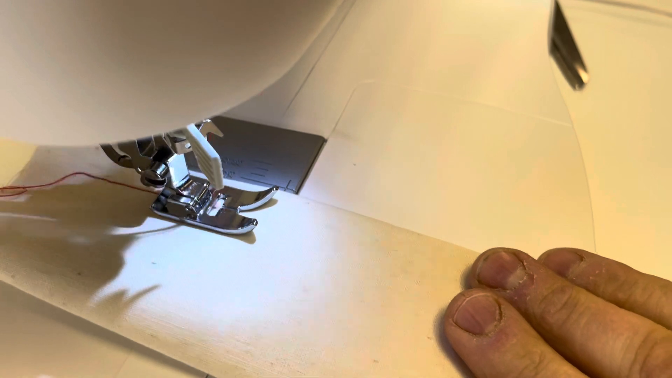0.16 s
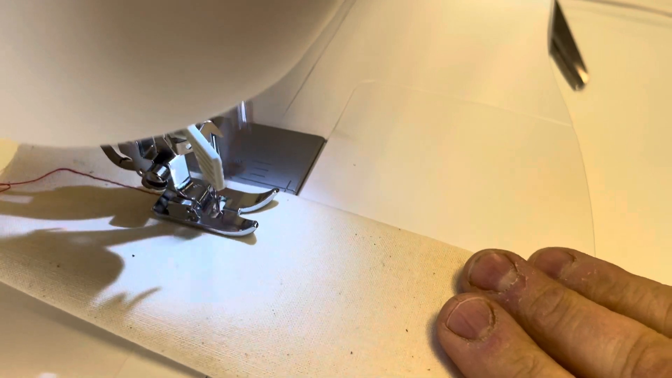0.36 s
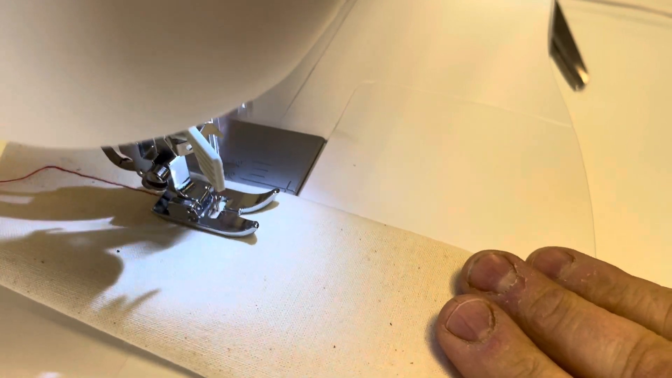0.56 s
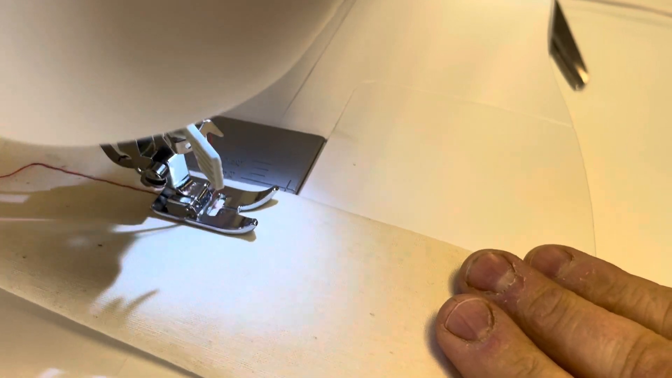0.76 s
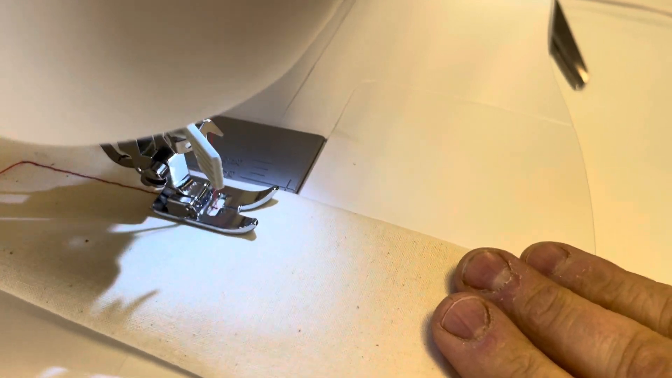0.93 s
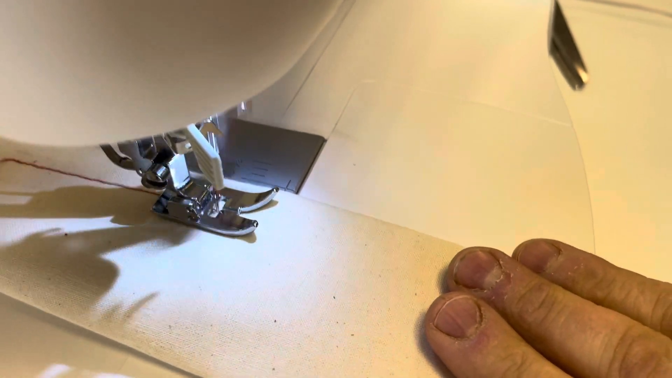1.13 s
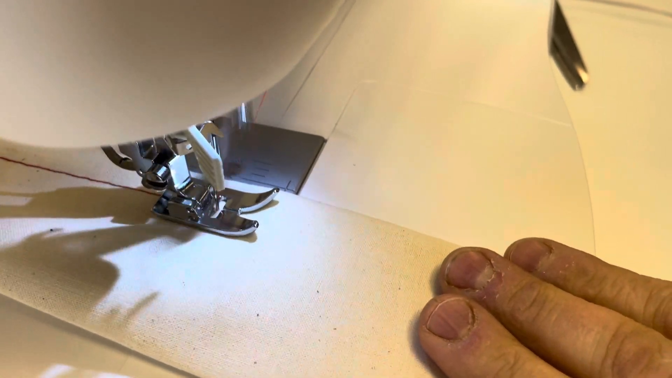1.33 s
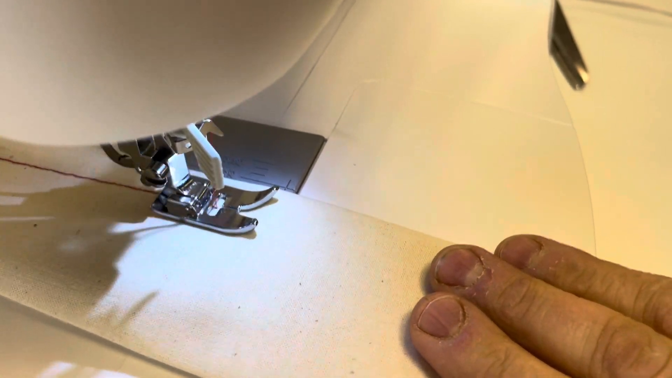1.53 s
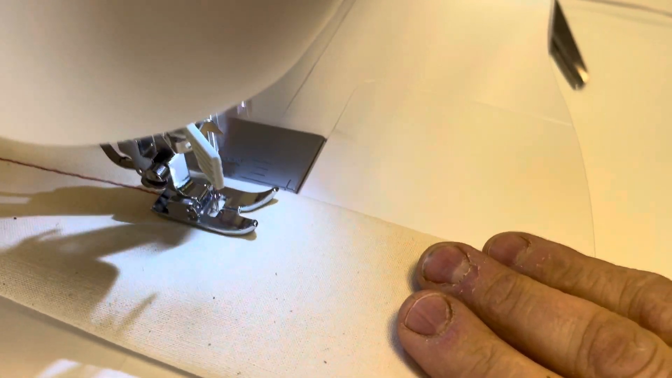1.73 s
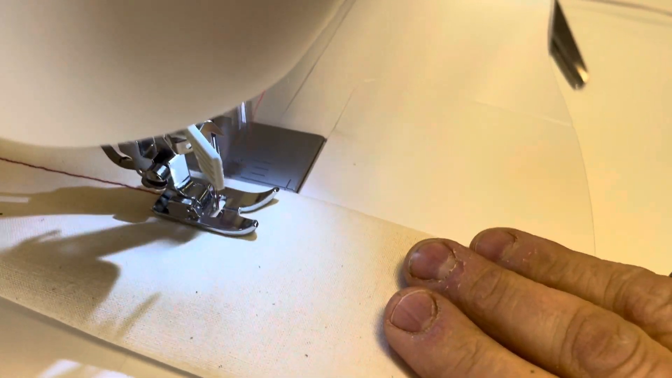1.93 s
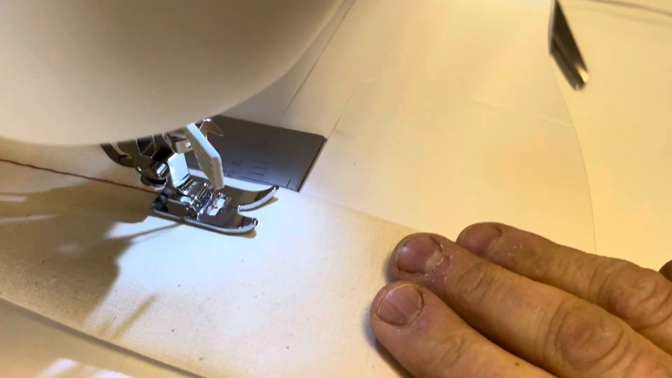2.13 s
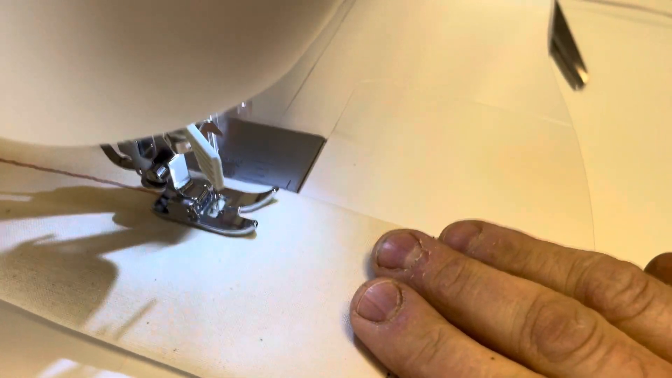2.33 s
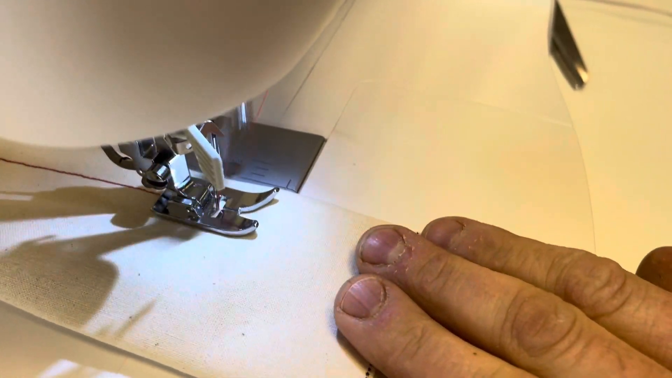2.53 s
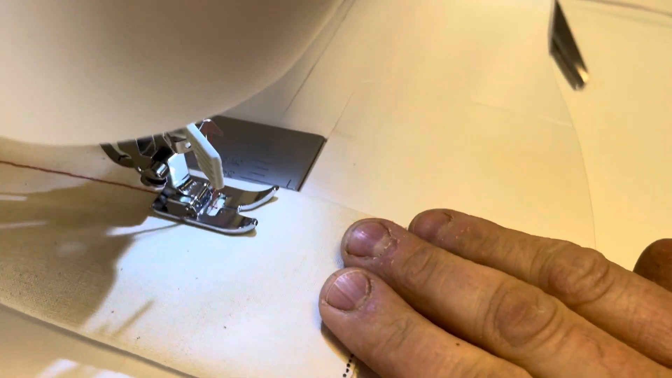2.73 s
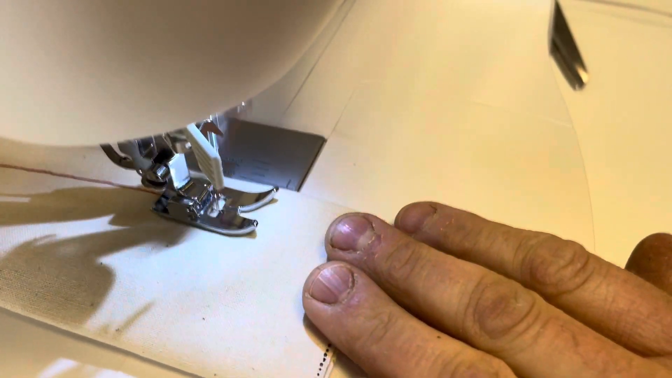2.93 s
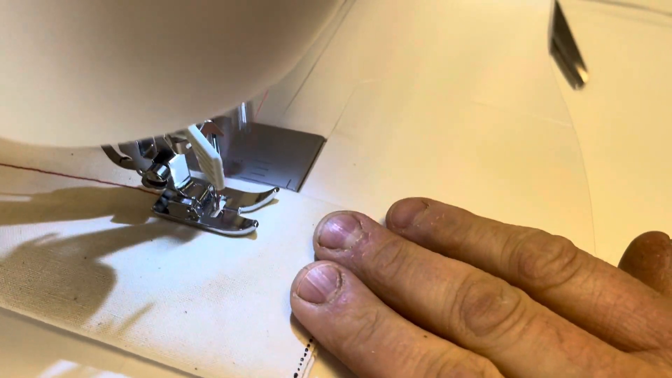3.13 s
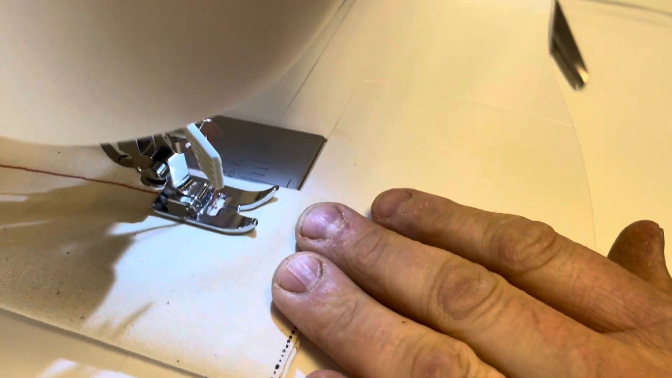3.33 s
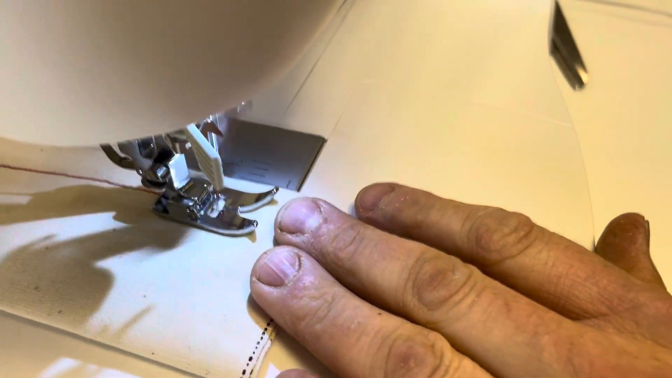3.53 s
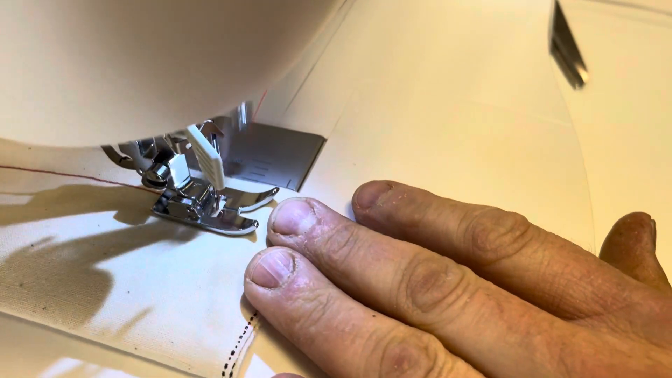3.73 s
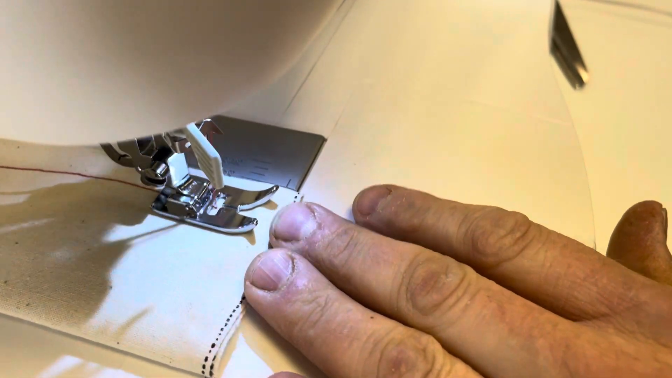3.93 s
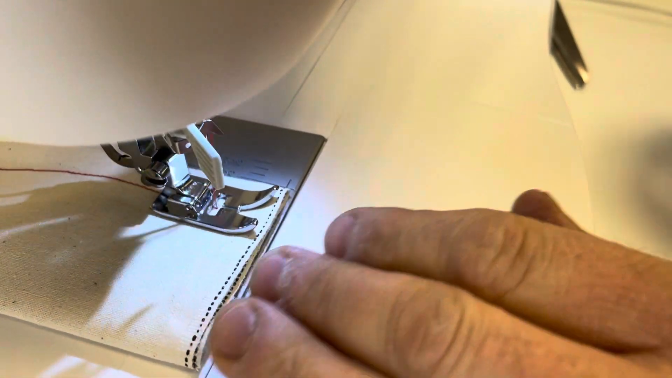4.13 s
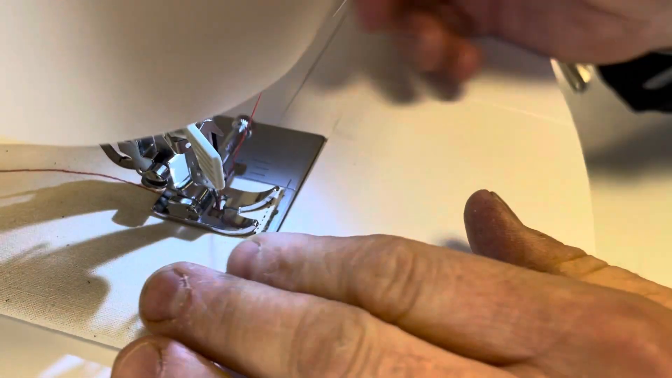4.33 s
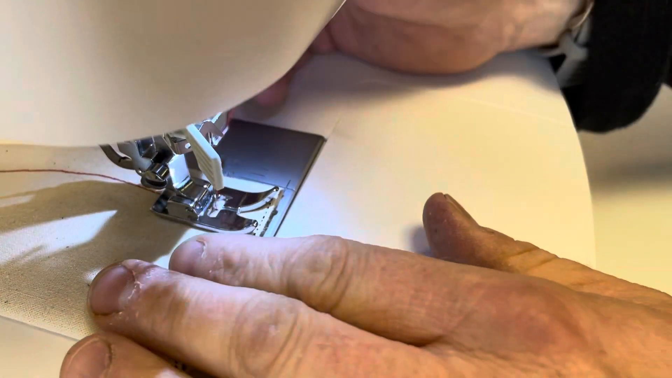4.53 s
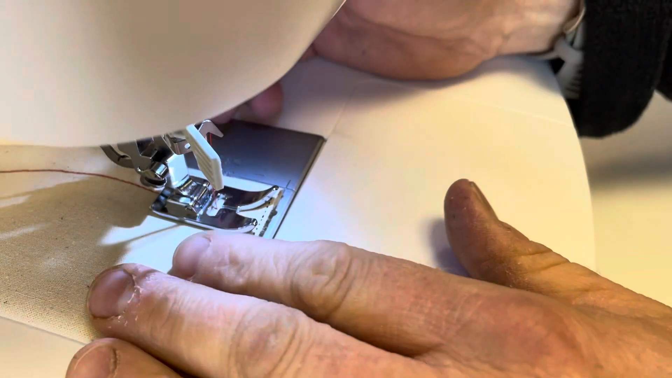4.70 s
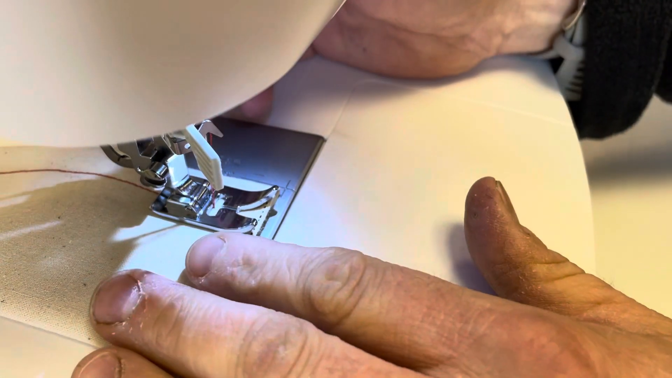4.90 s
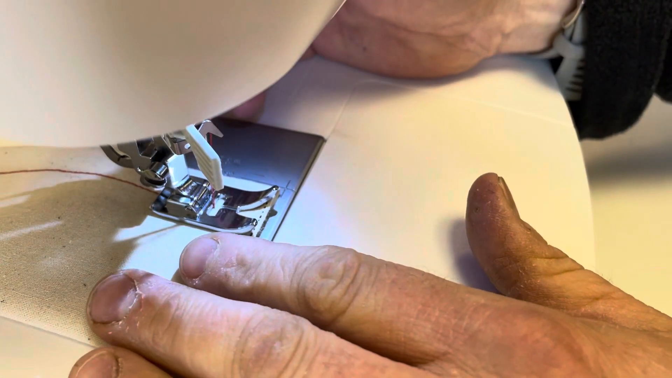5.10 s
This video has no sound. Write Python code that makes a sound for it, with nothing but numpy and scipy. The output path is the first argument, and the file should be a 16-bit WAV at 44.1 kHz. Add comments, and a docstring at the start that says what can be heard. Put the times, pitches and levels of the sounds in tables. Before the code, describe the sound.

A sewing machine is heard very close, in stereo, in a quiet, dry indoor room. From 0 to about 4.0 s it stitches at steady full speed, almost twelve turns a second: a dense, hollow, rattling drone with low motor hum, gear noise, a mid-pitched housing song, sharp bright hook ticks, uneven needle-bar clatter, cam knocks and low jolts through the table. Around 4.0-4.2 s the drive drops quickly, with a wavering whine near 500 Hz. From 4.2 to 4.75 s it creeps, much quieter, with a low rough buzz, thin whine and scattered soft knocks; grainy cloth swishing is clearest from 4.25 to 4.5 s. At about 4.75 s it clicks and dies away. Near silence follows, with a faint knock and short beating ring at 4.93 s. At about 5.08 s the motor kicks in again with knocks, and a low buzzing crawl continues to the end near 5.26 s.

```python
"""At a table in a quiet room, a sewing machine stitches steadily, slows to a crawl, halts and restarts.
Motor kicks are clicks and noise ringing the housing, with gear noise swelling along with the kicks;
hum, buzz and a wavering song are tones. Each turn of the shaft brings a hook tick, needle-bar clatter
and cam knocks from noise bursts, plus decaying tones for blows and table jolts; cloth swishes as
grainy noise while the machine slows. All is heard close up, in stereo."""
import sys
import numpy as np
from scipy import signal
from scipy.fft import rfft, irfft, next_fast_len
from scipy.io import wavfile
from scipy.ndimage import uniform_filter1d

SR = 44100
rng = np.random.default_rng(int(sys.argv[2]) if len(sys.argv) > 2 else 0)


def generate_wav(sig):
    """Save sig (samples, or channels by samples) to the path in sys.argv[1] as 16-bit PCM at SR."""
    pcm = np.round(np.clip(np.atleast_2d(sig).T, -1, 1) * 32767).astype(np.int16)
    wavfile.write(sys.argv[1], SR, pcm)


N = 231877  # length [samples]
HZ = np.fft.rfftfreq(4096, 1 / SR)  # frequency grid on which filters are drawn [Hz]

# quiet room: (frequency [Hz], relative level [dB])
FLOOR = [(24, -28), (40, 7.5), (75, -1), (110, -19), (173, -18), (490, -24), (710, -67), (956, -48),
         (1390, -69), (15000, -67)]
FLOOR_DB = -50.014
# the table rocks on its legs when leaned on: (time [s], level before the trim [dB])
ROCKING = [(2.81, -33), (3.41, -34), (3.95, -27), (4.15, -46), (4.44, -41), (4.83, -45.5)]
ROCKING_DB, ROCKING_TRIM = -44, 0.78  # steady level before the trim; trim as a gain
ROCK_S, STILL_S = 0.091, 4.88  # width of a lean and of the settling; time the table comes to rest
# low modes of the table top: (frequency [Hz], level [dB], t60 [s])
TABLE = [(69.65, -8, 0.72), (94.4, -7.5, 0.39), (102.9, -14, 0.41), (126.5, -9, 0.68)]
# jolts into the table on every turn: (shaft angle [turns], level [dB])
JOLTS = [(0.185, -48), (0.359, -25.5), (0.72, -31), (0.975, -37)]

# broad slope of the housing: (frequency [Hz], relative level [dB])
HOUSING = [(30, -15), (90, -2.5), (170, -7), (260, -3.5), (500, -0.5), (750, -6.5), (1100, -10),
           (2000, -19), (3500, -23.5), (5000, -25.5), (6600, -30.5), (7600, -34), (10500, -37.5),
           (12500, -38.5), (13700, -37), (14200, -32), (15000, -29), (15700, -32), (15900, -50),
           (16600, -70) ]
# housing modes: (frequency [Hz], width [Hz], height over the slope [dB])
HOUSING_MODES = [(49.6, 11, -9), (107.7, 51, 18), (201, 41, 4.5), (245.6, 19.7, 6.5), (274, 67, 2),
                 (341.6, 13.4, 9.5), (455.6, 51, 5.5), (530, 61, 4), (646, 143, 6.5), (858, 32, 5),
                 (981.6, 54, 9.5), (1213, 95, 5), (1728, 130, 9), (2173, 72, 6), (1832, 42, 3.5),
                 (2490, 39, 6.5), (2730, 66, 2), (2964, 140, 5.5), (4240, 120, 2), (3495, 520, 5.5),
                 (5960, 380, 1.5), (7700, 600, 6), (8940, 140, 5.5), (10700, 720, 4)]
# stereo picture: (frequency [Hz], left-right likeness [0-1])
SAME = [(40, .9), (70, .98), (170, .86), (300, .9), (400, .76), (510, .94), (750, .45), (1400, .46),
        (1800, .64), (4500, .7), (6000, .5), (6800, .95), (7300, .98), (8000, .95), (8600, .84), (9400, .7),
        (9900, .94), (10700, .98), (11700, .96), (12500, .55), (13300, .65), (14100, .98), (15000, .98),
        (15800, .9)]
# stereo picture: (frequency [Hz], left level over right [dB])
LOUDER_LEFT = [(60, 0), (110, 3.5), (200, -5.5), (380, 0.5), (700, 6), (1290, 3.5), (2380, 4), (4400, 4.5),
               (6000, 4.5), (6800, 0), (15000, 2)]
# stereo picture: (frequency [Hz], phase step of the right side [half turns])
PHASE_STEP = [(0, -.05), (320, -.03), (400, -.24), (900, -.27), (1500, -.15), (1800, 0), (3100, -.2),
              (5200, .03), (5700, .1), (6500, 1), (8500, 1), (9600, 2), (12300, 2), (13400, 3), (17000, 3)]
BASS_CUT_HZ, EDGE_HZ = 38, 16900  # lower and upper limit of the whole sound

# effort of the drive:
# (time [s], housing level [dB], gear rattle over it [dB], fizz over it [dB])
DRIVE = [(0, -24, -5.5, -22.5), (4.0, -23.5, -6, -19), (4.03, -28, -4.5, -11), (4.082, -26.5, -9, -26),
         (4.132, -27, -11.5, -19.5), (4.24, -37.5, -14, -21), (4.274, -34, -18, -10.5),
         (4.338, -37.5, -6, -6.5), (4.42, -33, -10, -18), (4.55, -33.5, -16.5, -23),
         (4.63, -33.5, -17, -40), (4.75, -34, -22, -25), (4.765, -37.5, -22, -28), (4.8, -52, -57, -22),
         (4.94, -77, 11, -28), (5.07, -57, -26, -26), (5.086, -39.5, -9.5, -34), (5.126, -31.5, -15.5, -16),
         (5.168, -37, -12, -40), (5.186, -33.5, -15, -18.5), (5.258, -33, -17, -32)]
DRIVE_EASES_S = DRIVE[1][0]
# motor kicks: (time [s], kick rate [1/s], share of the drive that comes as kicks [0-1])
KICKS = [(0, 317, 0.14), (4.0, 330, 0.24), (4.2, 152, 0.22), (4.4, 114, 0.36), (4.75, 99, 0.7),
         (5.26, 108, 0.43)]
KICK_DECAY_S = 0.0093
RUMBLE_DB, CRAWL_RUMBLE_DB = -28, -12  # table rumble over the housing, at full speed and after it
UNEVEN_DB, FIZZ_FLICKER_DB = 1, 3.5  # random swell of the load; flicker at the top of the rattle
HUM_HZ, HUM_DB, CRAWL_HUM_DB = 98.2, -9.5, -12.5  # levels over the housing level
# buzz of the motor as the shaft creeps: (multiple of BUZZ_HZ, level over the housing level [dB])
BUZZ = [(1, -10.5), (2, -11), (8, -43), (10, -26.5), (12, -40), (14, -31)]
BUZZ_HZ = 225.7
# the song as the machine crawls and restarts, one table a stretch:
# (time [s], frequency [Hz], level [dB])
WHINE = [
    [(4.24, 540, -35), (4.3, 544, -38), (4.35, 541.5, -42), (4.39, 543, -44), (4.43, 543, -35.5),
     (4.62, 545, -37.5), (4.66, 547, -47), (4.7, 539, -39), (4.76, 537, -46)],
    [(5.078, 540.5, -42), (5.11, 544, -39), (5.16, 521, -43), (5.2, 537, -35.5), (5.258, 540, -37)],
]
# the song wavers between about 495 and 532 Hz and swells as the machine slows:
# (time [s], frequency [Hz], level [dB])
SLOWING = [(4.0, 529.9, -24), (4.012, 532, -29), (4.026, 520.4, -20.5), (4.048, 496, -19),
           (4.062, 495, -37), (4.068, 497, -28), (4.094, 520, -33), (4.136, 505, -22), (4.178, 521, -30.5),
           (4.198, 500, -36), (4.225, 508, -55)]
# a part rings on, beating, after the halting knock: (time [s], frequency [Hz], level [dB])
AFTER_RING = [(4.915, 599, -48), (4.943, 630, -40), (4.953, 650, -38), (4.961, 645, -52), (4.971, 650, -41),
              (4.983, 645, -42.5), (4.992, 646, -59), (5.035, 636, -67), (5.05, 641, -75)]
# two fading housing modes that sing at full speed:
# (frequency [Hz], first level [dB], last level [dB])
SONG = [(551, -29.5, -39), (513.7, -35.5, -43.5)]
SONG_SWELL_DB = 2
# parts that ring with a clear pitch near the halt:
# (time [s], frequency [Hz], level [dB], t60 [s])
RINGS = [(4.758, 994, -39, 0.057), (4.935, 1690, -60, 0.18), (5.122, 964, -36, 0.06),
         (4.925, 800, -36, 0.07), (5.1, 105, -28.5, 0.4), (5.125, 235, -28, .1), (4.385, 93, -31, 0.64)]
# the cloth slides under the hands: (time [s], swish level [dB], high hiss level [dB])
CLOTH = [(4.2, -73, -85), (4.235, -50, -57), (4.28, -44, -51), (4.33, -43, -52), (4.37, -42, -48),
         (4.41, -42, -45), (4.47, -49.5, -55), (4.6, -58, -72), (4.75, -54, -76), (4.8, -81, -84)]
# colour of the swish: (frequency [Hz], relative level [dB])
SWISH = [(500, -31), (1000, 4), (1500, 12.5), (2200, 10), (4000, 1.5), (8000, -12), (11000, -21),
         (16000, -16)]

TURNS_PER_S, START_ANGLE = 11.652, .232  # full speed; shaft angle at time zero [turns]
FULL_SPEED_ENDS = 4.06  # [s]
# The levels from here on are nominal: the rise and fall of each blow lower its peak.
LINKS_PER_S, LINKS_DB, LINKS_TREBLE_DB = 1000, -34, -47.5  # lowest levels, the first one at 1 kHz
# single placed blows: (time [s], nominal level [dB], pitch [Hz])
THUDS = [(.083, -3, 555), (.24, -6, 580), (0.514, -5.5, 560), (.602, -6, 563), (.684, -4, 530),
         (1.111, -5, 545), (1.13, -5, 675), (1.201, -5.5, 516), (1.285, -3.5, 565), (1.479, -3.5, 594),
         (1.544, -4, 509), (2.054, -6, 493), (2.303, -4, 544), (2.357, -5, 570), (2.573, -3.5, 544),
         (3.0, -1.5, 555), (3.096, -2.5, 513), (3.43, -4.5, 560), (3.518, -3, 551), (3.563, -2, 524),
         (3.602, -3, 470), (3.794, -3.5, 515), (3.862, -3, 470), (3.898, -3.5, 563), (3.948, -4.5, 495),
         (4.438, -20.5, 533), (4.459, -24, 497), (4.499, -27, 545), (4.508, -25, 545), (4.517, -17, 550),
         (4.554, -19, 552.4), (4.601, -23, 556), (4.692, -17.5, 520), (4.715, -20, 507), (4.735, -24, 506),
         (4.93, -20, 264), (5.083, -21, 524), (5.094, -15.5, 530), (5.128, -11.5, 283), (5.182, -22, 540),
         (5.205, -15, 570)]
# blows inside the housing on every turn:
# (shaft angle [turns], pitch [Hz], mean nominal level [dB], decay [s])
BLOWS = [(0.018, 293, -21, 0.0063), (0.141, 333, -17.5, 0.0047), (.30, 240, -20.5, 0.0064),
         (.31, 348, -19.5, 0.0036), (0.449, 294, -22.5, 0.0057), (0.559, 296, -17, 0.0036),
         (0.749, 248.4, -16.5, 0.0056), (0.929, 311, -15.5, 0.0027), (.0, 539, -15.5, 0.0065),
         (.12, 560, -14, 0.0027), (0.204, 516, -11.5, 0.004), (.355, 546, -12, 0.0037),
         (0.459, 555, -16, 0.0047), (.63, 540, -15.5, .004), (.78, 524, -8, 0.0024),
         (0.859, 550, -14, 0.0035), (.26, 1005, -21.5, 0.0023), (.325, 982, -22, 0.0047),
         (.63, 875, -18, 0.0032), (.935, 1020, -15, 0.0012), (0.996, 1020, -22.5, 0.0032)]
BLOW_SPREAD_DB, BLOW_JITTER_S = 2, .00015
THUD_S, BLOW_RISE_S = 0.0038, 0.0026
# cam knocks on every turn:
# (shaft angle [turns], centre [Hz], width [Hz], mean nominal level [dB], decay [s])
CAMS = [(0.17, 5000, 3600, -29, 0.0036), (.21, 10300, 2700, -39.5, 0.0023),
        (.87, 9760, 3700, -36.5, 0.0049), (0.23, 1900, 570, -26.5, 0.0027), (0.322, 990, 630, -19, 0.0017),
        (.63, 810, 660, -26.5, 0.0025), (0.915, 1360, 590, -25, 0.0053), (0.909, 1010, 480, -22.5, 0.0055)]
# single knocks as the shaft creeps:
# (time [s], nominal level [dB], centre [Hz], width [Hz], decay [s])
KNOCKS = [(4.066, -22.5, 8700, 4000, 0.0033), (4.157, -27, 6030, 5000, 0.0056),
          (4.187, -30, 7100, 3994, 0.00253), (4.745, -34, 9200, 9000, 0.013),
          (4.759, -29, 990, 600, 0.0072), (4.793, -38.5, 4570, 4020, 0.0083),
          (4.922, -38.5, 2900, 1970, 0.0053), (4.928, -36, 1750, 2590, 0.019),
          (4.983, -45.5, 5770, 2000, 0.0053), (5.075, -40, 2660, 3030, 0.015),
          (5.11, -44, 6000, 1490, 0.007), (5.124, -28.5, 4360, 5030, 0.0094), (5.122, -25, 980, 600, 0.008),
          (5.18, -37, 5000, 6000, 0.0057)]
# turns on which the needle bar slams:
# (time [s], nominal level [dB], treble over it [dB])
CLATTERS = [(0.15, -14, -3), (0.239, -10.5, -2.5), (0.323, -11, -4.5), (0.409, -14, -0.5), (0.841, -12, -5),
            (1.009, -13, -4), (1.09, -12.5, -21), (1.181, -15, -11), (1.262, -19.5, -18), (1.439, -11, -8),
            (1.69, -12.5, -13), (1.783, -15, 1.5), (1.87, -12.5, -4), (1.953, -13, -6), (2.034, -14.5, -9),
            (2.126, -10, -6), (2.211, -12, -4.5), (2.296, -11.5, -1.5), (2.469, -16, -2), (2.551, -14, -11),
            (2.642, -17, -5), (2.721, -15, -9), (2.893, -13, -17), (2.977, -14.5, -29),
            (3.072, -10.5, -5.5), (3.153, -17, -21), (3.24, -12, -8), (3.498, -17, -8), (3.585, -11, -10),
            (3.758, -10.5, -6), (3.845, -10, -5.5), (3.923, -16.5, -14)]
CLATTER_TURN = .93  # shaft angle of the soft clatters [turns]
CLATTER_DB, CLATTER_SPREAD_DB, CLATTER_TREBLE_DB = -19.5, 4.5, -14
# the hook itself rings: (frequency [Hz], mean nominal level [dB])
TICK_RINGS = [(9110, -26.5), (5540, -32)]
TICK_RING_S = 0.0021  # decay
TICK_TURN, TICK_JITTER_S = .477, .0008  # the hook catches the thread: shaft angle [turns], jitter
TICK_DB, TICK_MIDDLE_DB, TICK_SPREAD_DB, MIDDLE_SPREAD_DB = -20.5, -26, 1.2, 2
REBOUND_S, REBOUND_DB = 0.0047, -9.5  # delay after the tick, level over it


def gain_of(db):
    """Amplitude ratio of a level in dB."""
    return 10 ** (np.asarray(db) / 20)


def read(points, hz):
    """Curve through (frequency, value) points, straight on a log frequency axis."""
    f, value = np.transpose(points)
    return np.interp(np.log(hz + 1), np.log(f + 1), value)


def wander(size):
    """Slow random drift of unit strength, smoothed twice over the given number of samples."""
    x = uniform_filter1d(uniform_filter1d(rng.standard_normal(N), size), size)
    return x / x.std()


def band(lo_hz, hi_hz):
    """dB shape of a pass band with soft skirts."""
    return -10 * np.log10((1 + (lo_hz / (HZ + 1)) ** 6) * (1 + (HZ / hi_hz) ** 6))


def colour(x, shape_db):
    """Causal minimum-phase filter of the given dB shape, scaled so that white noise keeps its power."""
    mirrored_db = np.r_[shape_db, shape_db[-2:0:-1]]
    log_gain = np.log(gain_of(np.maximum(mirrored_db, -150)))
    taps = np.fft.ifft(np.exp(np.conj(signal.hilbert(log_gain)))).real
    return signal.oaconvolve(x, taps[None] / np.linalg.norm(taps))[:, :N]


def housing_db():
    """Broad slope of the casing with its modes standing out."""
    modes_db = sum(db / (1 + (2 * (HZ - hz) / width) ** 2) for hz, width, db in HOUSING_MODES)
    return read(HOUSING, HZ) + modes_db


def bursts(s, size, decay, rise=.0005):
    """Envelope of blows: rise times exponential fall, scaled by size; a slow rise lowers the peak."""
    at = np.zeros(N)
    t = np.arange(round(8 * decay * SR)) / SR
    np.add.at(at, np.clip(np.round(np.asarray(s) * SR).astype(int), 0, N - 1), size)
    return abs(signal.oaconvolve(at, (1 - np.exp(-t / rise)) * np.exp(-t / decay))[:N])


def random_moments(per_s):
    """Times scattered at random at the given mean rate."""
    return np.flatnonzero(rng.random(N) < per_s / SR) / SR


def shaken(envelope):
    """Two unrelated noises under one envelope: what both sides share and what only the right one gets."""
    return envelope * rng.standard_normal((2, N))


def each_turn(angle, jitter):
    """Moments at which the shaft passes an angle while at full speed."""
    s = (np.arange(60) + angle - START_ANGLE) / TURNS_PER_S + jitter * rng.standard_normal(60)
    return s[(s > 0) & (s < FULL_SPEED_ENDS)]


def room():
    """Steady noise floor of the quiet room."""
    return gain_of(FLOOR_DB) * colour(shaken(1), read(FLOOR, HZ))


def rocking():
    """Dull noise at the very bottom, steady while the machine moves, swelling with each lean."""
    t = np.arange(N) / SR
    level = gain_of(ROCKING_DB) * np.clip((STILL_S - t) / ROCK_S, .1, 1)
    level += sum(gain_of(db) * np.exp(-((t - s) / ROCK_S) ** 2) for s, db in ROCKING)
    return level * colour(shaken(ROCKING_TRIM), band(40, 74.5))


def table():
    """Jolts ring the low modes of the table top, with a slightly different strength on each turn."""
    t, at = np.arange(SR // 2) / SR, np.zeros(N)
    ring = sum(gain_of(db - 60 * t / t60) * np.sin(2 * np.pi * hz * t) for hz, db, t60 in TABLE)
    for angle, db in JOLTS:
        s = each_turn(angle, .0006)
        at[(s * SR).astype(int)] += gain_of(db + 1.25 * rng.standard_normal(len(s)))
    ring = signal.oaconvolve(ring, signal.windows.hann(200) / 100)  # a jolt is a soft push
    return signal.oaconvolve(at, ring)[:N] * np.array([[1], [0]])


def cloth():
    """Fibres slipping: a coarse, grainy swish that wakes the housing modes, with a thin hiss on top."""
    s, swish_db, hiss_db = np.transpose(CLOTH)
    t = np.arange(N) / SR
    grain = 0.77 + bursts(random_moments(500), 0.9, 0.001, rise=0.00025)
    grain = grain * gain_of(1.2 * wander(400))
    modes_db = housing_db() - read(HOUSING, HZ)
    swish_noise = shaken(grain * gain_of(np.interp(t, s, swish_db)))
    hiss_noise = shaken(grain * gain_of(np.interp(t, s, hiss_db)))
    return colour(swish_noise, read(SWISH, HZ) + 0.27 * modes_db) + colour(hiss_noise, band(6200, 7700))


def plate():
    """Parts near the halt give dying tones with a soft start."""
    out = np.zeros(N)
    for s, hz, db, t60 in RINGS:
        t = np.maximum(np.arange(N) / SR - s, 0)
        out += gain_of(db - 60 * t / t60) * (1 - np.exp(-t / 0.0014)) * np.sin(2 * np.pi * hz * t)
    return out * np.array([[1], [.5]])


def whine(rows, swell_db=0, unsteady=1):
    """A tone following a pitch and level curve, more or less unsteady, faded at both ends."""
    s, hz, db = np.transpose(rows)
    t = np.arange(N) / SR
    fade = np.clip(np.minimum(t - s[0], s[-1] - t) / 0.019, 0, 1)
    pitch = np.interp(t, s, hz) * (1 + unsteady * 0.011 * wander(500))
    tone = np.sqrt(2) * np.sin(2 * np.pi * np.cumsum(pitch) / SR)
    throb_db = unsteady * 45 * uniform_filter1d(rng.standard_normal(N), 500)
    level_db = np.interp(t, s, db) + throb_db + swell_db * wander(3000)
    return fade * gain_of(level_db) * tone * np.array([[1], [.5]])


def song():
    """Housing modes sing at full speed; the tone wavers through the slowing, the crawl and the halt."""
    out = sum(whine(rows, unsteady=0.59) for rows in WHINE)
    out += whine(SLOWING, unsteady=.3) + whine(AFTER_RING, unsteady=0)
    for hz, first_db, last_db in SONG:
        # starting before zero skips the fade-in
        out += whine([(-.1, hz, first_db), (DRIVE_EASES_S, hz, last_db)], SONG_SWELL_DB)
    return out


def buzz():
    """The creeping motor buzzes on one note with overtones, each wavering in level."""
    s, level_db = np.transpose(DRIVE)[:2]
    t = np.arange(N) / SR
    turns = np.cumsum(BUZZ_HZ * (1 + 0.00298 * wander(1500))) / SR
    tone = sum(gain_of(db + 3.6 * wander(500)) * np.sin(2 * np.pi * k * turns) for k, db in BUZZ)
    creeping = t > WHINE[0][0][0]
    return gain_of(np.interp(t, s, level_db)) * creeping * tone * np.array([[1], [.5]])


def hum():
    """The motor drones at a slightly wavering pitch, its level following the drive smoothly."""
    s, level_db = np.transpose(DRIVE)[:2]
    t = np.arange(N) / SR
    over_db = np.where(t < FULL_SPEED_ENDS, HUM_DB, CRAWL_HUM_DB)
    level = uniform_filter1d(gain_of(np.interp(t, s, level_db) + over_db), 2000)
    turns = np.cumsum(HUM_HZ * (1 + 0.87 * uniform_filter1d(rng.standard_normal(N), 3000))) / SR
    return level * np.sqrt(2) * np.sin(2 * np.pi * turns) * np.array([[1], [0]])


def drive():
    """Motor kicks shake the housing as clicks and noise; gear noise and fizz swell with the kicks."""
    t = np.arange(N) / SR
    s, *curves = np.transpose(DRIVE)
    level_db, gear_db, fizz_db = (np.interp(t, s, c) for c in curves)
    rumble_db = np.where(t < FULL_SPEED_ENDS, RUMBLE_DB, CRAWL_RUMBLE_DB)
    kick_s, *kick_curves = np.transpose(KICKS)
    rate, share = (np.interp(t, kick_s, c) for c in kick_curves)
    share = np.clip(share, 0, 1)

    # a kick falls each time the wavering count passes a whole number
    waver = 1 + 2.5 * uniform_filter1d(rng.standard_normal(N), 300)
    at = np.flatnonzero(np.diff(np.floor(np.cumsum(rate * waver) / SR)))
    size = gain_of(3 * np.clip(rng.standard_normal(len(at)), -2, 1.5))
    kicks = bursts(at / SR, size, KICK_DECAY_S)
    kicks /= np.sqrt(abs(uniform_filter1d(kicks ** 2, 4000)) + 1e-9)  # even out the local power
    clicks = np.zeros((2, N))
    signs = [np.ones(len(at)), rng.choice([-1., 1.], len(at))]
    clicks[:, at] = size * np.sqrt(SR / rate[at]) * signs

    # like clicks keep the low modes ringing
    push = shaken(np.sqrt(1 - share)) + np.sqrt(share) * 0.64 * clicks
    fizz = np.sqrt(0.15 * share * kicks ** 2 + 1 - 0.25 * share) * gain_of(FIZZ_FLICKER_DB * wander(150))
    gears = np.sqrt(3.26 * share * kicks ** 2 + 1 - 0.23 * share)
    body_db = level_db + UNEVEN_DB * wander(900)
    out = gain_of(body_db) * colour(push, housing_db() + band(154.5, 890))
    ranges = [(gear_db, band(778, 5470), shaken(gears)),
              (fizz_db, band(5870, 15000), shaken(fizz)),
              (rumble_db, band(58, 98), push)]
    for over_db, shape, shake in ranges:
        out += gain_of(level_db + over_db) * colour(shake, housing_db() + shape)
    return out


def links():
    """Small contacts, each ringing near one of the upper housing modes for a moment."""
    t, out = np.arange(400) / SR, np.zeros((2, N + 400))
    upper = [hz for hz, width, db in HOUSING_MODES if hz > 1100]
    for when, which, detune, luck, side in rng.random((round(LINKS_PER_S * FULL_SPEED_ENDS), 5)):
        at = int(when * FULL_SPEED_ENDS * SR)
        hz = upper[int(which * len(upper))] * (1 + 0.14 * (detune - .5))
        size = gain_of(LINKS_TREBLE_DB) if hz > 6800 else gain_of(LINKS_DB) * (1000 / hz) ** 0.21
        size *= gain_of(3.2 * min(-np.log(luck), 3))  # a few contacts are much harder
        ring = (1 - np.exp(-t / .0004)) * np.exp(-t / 0.0016) * np.sin(2 * np.pi * hz * t)
        out[:, at:at + 400] += size * ring * [[1], [np.sign(side - .5)]]
    return out[:, :N]


def thuds():
    """Each blow rings one low mode briefly; those tied to the shaft start in the same phase every turn."""
    out, t = np.zeros((2, N + 1600)), np.arange(1600) / SR
    phases = rng.random((len(THUDS), 2))  # [turns], for the shared and the right-only sound
    rows = [(s, hz, db, THUD_S, phase) for (s, db, hz), phase in zip(THUDS, phases)]
    for angle, hz, db, decay in BLOWS:
        for at in each_turn(angle, BLOW_JITTER_S):
            # a placed thud near in time and pitch takes the blow's place
            taken = any(abs(at - s) < .012 and abs(hz - pitch) < 100 for s, _, pitch in THUDS)
            if not taken:
                blow_db = db + BLOW_SPREAD_DB * rng.standard_normal()
                rows.append((at, hz, blow_db, decay, np.array([0, .25])))
    for s, hz, db, decay, phase in rows:
        envelope = (1 - np.exp(-t / BLOW_RISE_S)) * np.exp(-t / decay)
        ring = envelope * np.sin(2 * np.pi * (hz * t + phase[:, None]))
        start = round(s * SR)
        out[:, start:start + 1600] += gain_of(db) * ring
    return out[:, :N]


def knock(s, size, hz, width, decay):
    """Noise blows that ring the housing around one centre."""
    shape = -20 * np.log10(1 + (2 * (HZ - hz) / width) ** 2)
    return colour(shaken(bursts(s, size, decay)), housing_db() + shape)


def cams():
    """Knocks at set shaft angles, each time a little different in strength, then single ones at the crawl."""
    out = 0
    for angle, hz, width, db, decay in CAMS:
        s = each_turn(angle, 0.00083)
        out = out + knock(s, gain_of(db + 2.9 * rng.standard_normal(len(s))), hz, width, decay)
    return out + sum(knock([s], gain_of(db), hz, width, decay) for s, db, hz, width, decay in KNOCKS)


def needle_bar():
    """A looser clatter of several contacts, swelling and fading; between slams it turns over softly."""
    soft = each_turn(CLATTER_TURN, 0.00079)
    soft = np.array([at for at in soft if min(abs(at - row[0]) for row in CLATTERS) > .025])
    soft_db = CLATTER_DB + CLATTER_SPREAD_DB * rng.standard_normal(len(soft))
    soft_rows = [soft, soft_db, np.full(len(soft), CLATTER_TREBLE_DB)]
    s, db, treble_db = np.c_[np.transpose(CLATTERS), soft_rows]
    grit = np.minimum(bursts(random_moments(600), 1., .0012), .6) + .4
    out = 0
    for level_db, shape in [(db, band(1980, 8700)), (db + treble_db, band(6700, 17000))]:
        swell = uniform_filter1d(bursts(s - .004, gain_of(level_db), .004, rise=.003), 420)
        out = out + colour(shaken(grit * swell), housing_db() + shape)
    return out


def hook():
    """A sharp tick with a weaker rebound, as noise in treble and middle, over short rings of the hook."""
    s = each_turn(TICK_TURN, TICK_JITTER_S) - .0015
    s = s[s < DRIVE_EASES_S]
    treble_luck, middle_luck = rng.standard_normal((2, len(s)))
    middle_luck_db = MIDDLE_SPREAD_DB * middle_luck
    layers = [(TICK_DB + TICK_SPREAD_DB * treble_luck, .0016, 2 * band(6860, 12400)),
              (TICK_MIDDLE_DB + middle_luck_db, .004, band(2400, 4900))]
    out = 0
    for level_db, rise, shape in layers:
        tick = bursts(s, gain_of(level_db), 0.0024, rise=rise)
        rebound = bursts(s + REBOUND_S, gain_of(level_db + REBOUND_DB), 0.0015, rise=0.0013)
        out = out + colour(shaken(tick + rebound), housing_db() + shape)
    ring = 0
    for hz, db in TICK_RINGS:
        turns = hz * np.cumsum(1 + .015 * wander(2000)) / SR
        ring = ring + gain_of(db) * np.sin(2 * np.pi * turns)
    ring_envelope = bursts(s, gain_of(middle_luck_db), TICK_RING_S, rise=0.00057)
    return out + ring_envelope * ring * np.array([[1], [.5]])


def walls(pair, t60=0.024, wet_db=-7.0):
    """Nearby surfaces add a short diffuse tail."""
    t = np.arange(SR // 4) / SR
    tail = rng.standard_normal((2, len(t))) * gain_of(-60 * t / t60) * (t > .003)
    wet = signal.oaconvolve(pair, tail / np.linalg.norm(tail[0]), axes=1)[:, :N]
    return pair + gain_of(wet_db) * wet


def stereo_picture(pair):
    """Sets left-right likeness, phase step and level difference by frequency; right adds its own share."""
    size = next_fast_len(N)
    hz = np.fft.rfftfreq(size, 1 / SR)
    shared, own = rfft(pair, size)
    same = np.clip(read(SAME, hz), 0, 1)
    tilt = gain_of(read(LOUDER_LEFT, hz) / 2)  # half the level difference on each side
    right = same * shared + np.sqrt(1 - same ** 2) * own
    right = right * np.exp(1j * np.pi * read(PHASE_STEP, hz))
    return irfft(np.array([shared * tilt, right / tilt]), size)[:, :N]


def scene():
    """All layers from the room to the machine, spread into stereo."""
    background = room() + rocking() + table()
    metal = walls(cloth() + links() + cams() + needle_bar() + hook())
    machine = plate() + song() + buzz() + hum() + drive() + thuds() + metal
    return stereo_picture(background + machine)


def record(dry):
    """Drops the deepest bass, then cuts everything above the upper band limit."""
    bass_cut = signal.butter(N=4, Wn=BASS_CUT_HZ, btype="high", fs=SR, output="sos")
    thin = signal.sosfilt(bass_cut, dry)
    edge = signal.firwin(511, EDGE_HZ, window=("kaiser", 9), fs=SR)
    return signal.oaconvolve(thin, edge[None], "same")


dry = scene()
out = record(dry)
generate_wav(out)
```